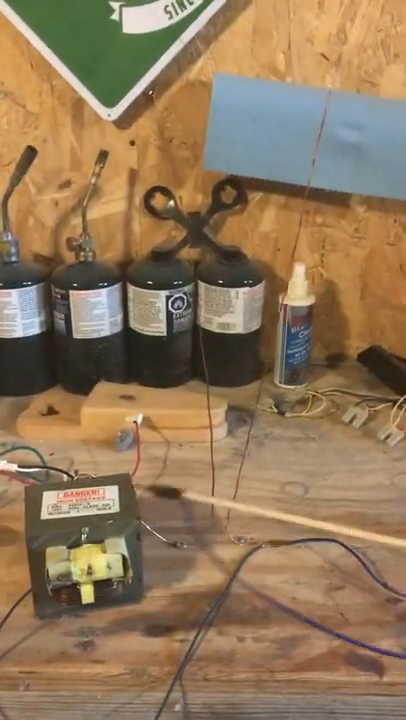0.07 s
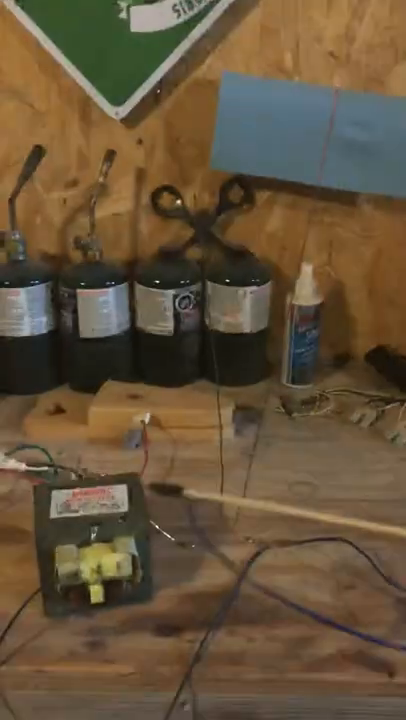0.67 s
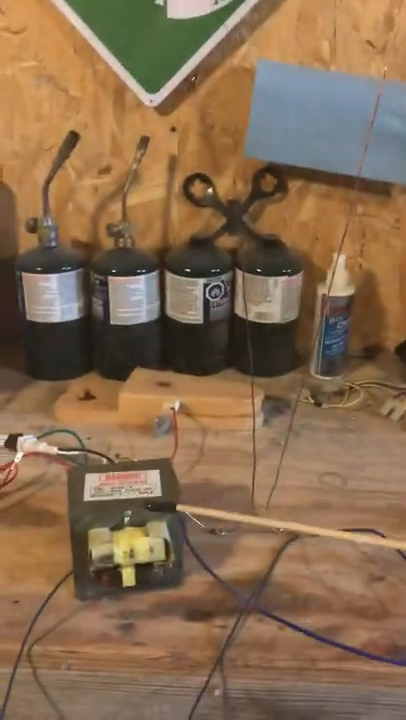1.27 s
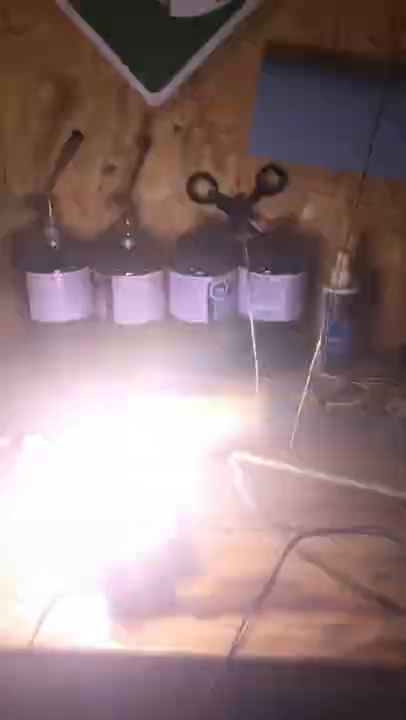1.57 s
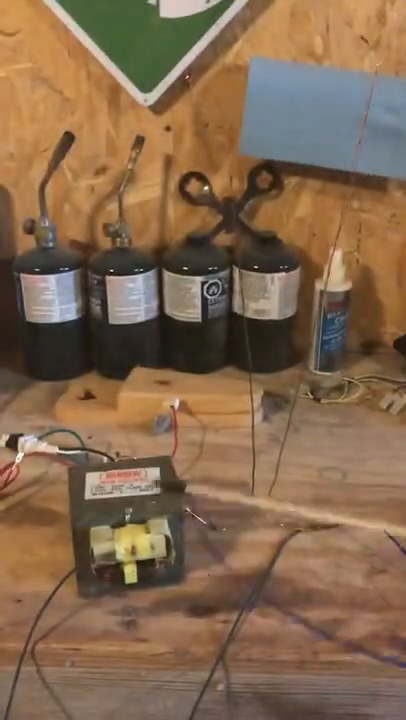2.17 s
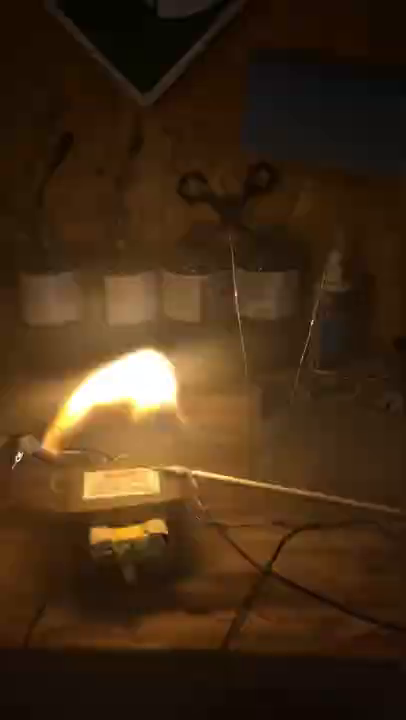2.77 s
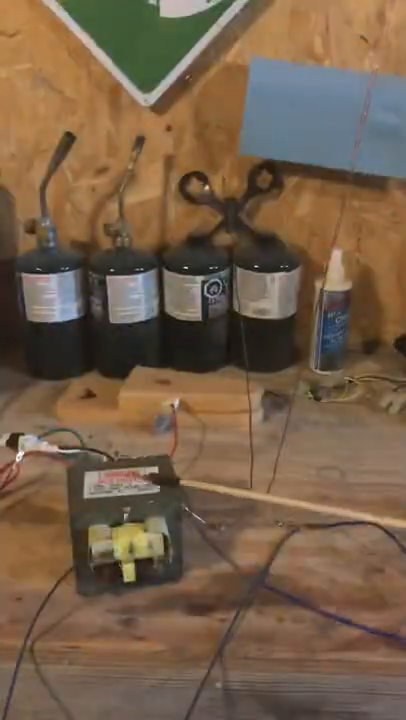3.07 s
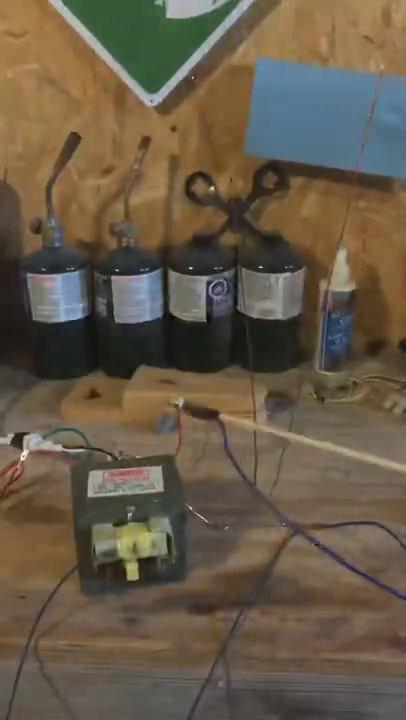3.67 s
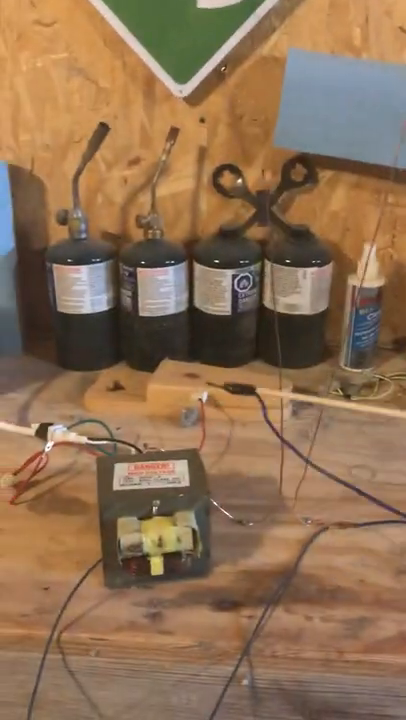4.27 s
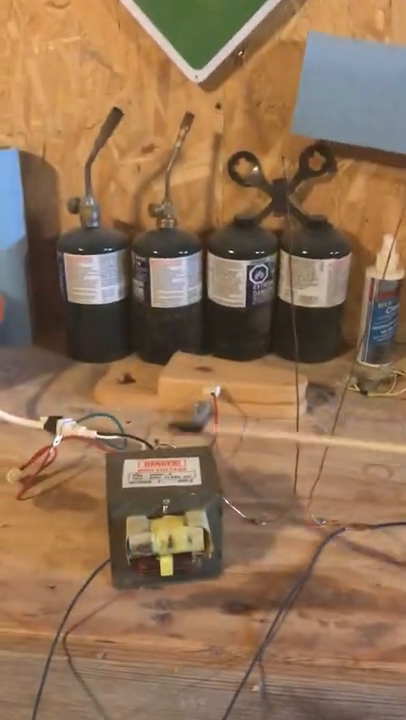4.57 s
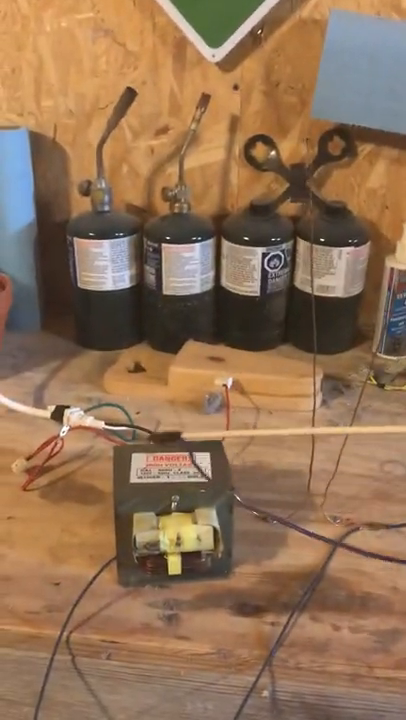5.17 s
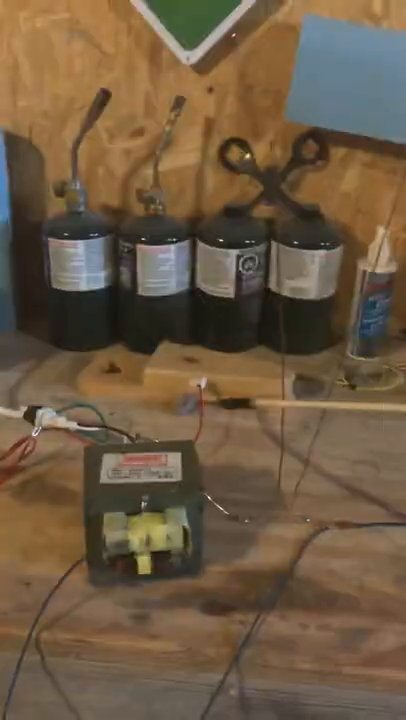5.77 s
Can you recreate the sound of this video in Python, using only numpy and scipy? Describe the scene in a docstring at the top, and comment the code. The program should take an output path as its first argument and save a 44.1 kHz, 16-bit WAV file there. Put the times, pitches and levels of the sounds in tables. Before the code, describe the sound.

Sharp spark crackles lead into five brief, low electrical buzzes, with a quiet hum and rush of air between them.

```python
"""Over a faint hum and rush of air, sparks crack and an electric arc buzzes, five times in all.
A wire on a wooden stick draws the arcs from a mains transformer on a workshop bench.
Each touch spits bursts of sparks. Then a flame of glowing air stands in the gap, hums and pops
in time with the mains, stretches and breaks. The wooden room echoes every crack."""
import sys
import numpy as np
from scipy import signal
from scipy.fft import rfft, irfft, next_fast_len
from scipy.io import wavfile
from scipy.ndimage import map_coordinates

SR = 44100
rng = np.random.default_rng(int(sys.argv[2]) if len(sys.argv) > 2 else 0)


def pcm_store(signal):
    """Save signal as 16-bit PCM."""
    levels = np.round(np.clip(np.atleast_2d(signal), -1, 1) * 32767)
    wavfile.write(sys.argv[1], SR, levels.astype(np.int16).T)


N = 265482
MAINS_HZ = 60


def amp(db):
    """Turn decibels into a number to multiply by."""
    return 10 ** (np.asarray(db) / 20)


def unit(x):
    """Scale a sound to an average strength (rms) of 1."""
    return x / np.sqrt(np.mean(x ** 2) + 1e-20)


def along(points, hz):
    """Read between (frequency, value) points, with octaves evenly spaced."""
    freqs, values = np.transpose(points)
    return np.interp(np.log(hz + 1), np.log(freqs + 1), values)


def clock():
    """The time of every sample, in seconds."""
    return np.arange(N) / SR


def wobble(rate):
    """A smooth random curve through `rate` points a second."""
    return map_coordinates(rng.standard_normal(int(N * rate / SR) + 4), [clock() * rate])


def filtered(x, response):
    """Turn each frequency up or down by response(hz)."""
    size = next_fast_len(N + SR // 2)
    return irfft(rfft(x, size) * response(np.fft.rfftfreq(size, 1 / SR)), size)[:N]


def pulse(spectrum, size=2048):
    """The shortest click with this tone colour, of energy 1."""
    log_gain = np.log(amp(along(spectrum, np.fft.rfftfreq(size, 1 / SR))))
    cepstrum = irfft(log_gain)
    # folding the second half onto the first packs the energy at the start of the click
    cepstrum[1:size // 2] *= 2
    cepstrum[size // 2 + 1:] = 0
    shape = irfft(np.exp(rfft(cepstrum)))
    return shape / np.linalg.norm(shape)


# tone colour of the moving air: (frequency [Hz], relative level [dB])
AIR_SPECTRUM = [(20, -105), (40, -81), (90, -77), (155, -85), (230, -83.5), (390, -81), (500, -87),
                (1000, -89.5), (1300, -90.5), (2200, -95.5), (2700, -99), (4800, -104), (7500, -112),
                (16000, -119.5)]
# narrow bands that ring in the rush: (pitch [Hz], width [Hz], relative level [dB])
AIR_RESONANCES = [(194, 12, -64), (245, 14, -64), (274, 12, -64), (312, 12, -63), (560, 22, -67),
                  (996, 25, -68), (1098, 35, -65), (1165, 30, -70), (1900, 100, -71), (2300, 250, -70),
                  (3650, 600, -71), (6680, 200, -77), (7130, 180, -80), (9300, 900, -82), (11170, 250, -85)]
# idle mains hum and two thin whines: (pitch [Hz], relative level [dB])
IDLE_TONES = [(120, -56.5), (240, -65), (360, -66), (600, -74), (1394, -76), (6638, -84)]


def background():
    """Moving air rushes and drones while the idle mains hums."""
    air = np.sqrt(SR / 2) * filtered(rng.standard_normal(N), lambda hz: amp(along(AIR_SPECTRUM, hz)))
    drone, tones = np.zeros(N), np.zeros(N)
    for centre, width, db in AIR_RESONANCES:
        band = filtered(rng.standard_normal(N), lambda hz: 1 / (1 + (2 * (hz - centre) / width) ** 2))
        drone += amp(db) * unit(band)
    for hz, db in IDLE_TONES:
        strength = np.sqrt(2) * amp(db + 0.89 * wobble(2))
        tones += strength * np.sin(2 * np.pi * hz * clock() + rng.uniform(0, 2 * np.pi))
    return amp(1.33 + .4 * wobble(4.8)) * air + amp(1.66) * drone + amp(1.46) * tones


# bounces off the bench and near walls: (delay [s], level [dB])
NEAR_ECHOES = [(.0016, -17), (.0028, -24.5), (.0045, -14), (.0064, -23.5), (.0078, -16)]


def near_echoes(x):
    """Each nearby surface sends back a quieter copy a moment later."""
    return sum(amp(db) * np.pad(x, (round(delay * SR), 0))[:N] for delay, db in NEAR_ECHOES)


# how long the wooden room rings: (frequency [Hz], time to fade by 60 dB [s])
ROOM_FADE = [(150, 0.12), (600, 0.33), (1500, 0.27), (4000, 0.21), (9000, 0.17), (16000, 0.077)]


def room(x, wet_db, build_s=.0016):
    """Echoes blur into a tail that dies sooner in the treble; the arc moves, so each gets its own."""
    out = np.zeros(N)
    midpoints = [round((arc[1] + following[0]) / 2 * SR) for arc, following in zip(ARCS, ARCS[1:])]
    for start, end in zip([0] + midpoints, midpoints + [N]):
        hz, t, noise = signal.stft(rng.standard_normal(SR // 2), SR, nperseg=256)
        fade = amp(-60 * t / along(ROOM_FADE, hz)[:, None])
        _, tail = signal.istft(noise * fade, SR, nperseg=256)
        tail *= 1 - np.exp(-np.arange(len(tail)) / SR / build_s)
        echo = signal.fftconvolve(x[start:end], tail / np.linalg.norm(tail))[:N - start]
        out[start:start + len(echo)] += echo
    return amp(wet_db) * out


def harmonics(partials, waver_db):
    """Tones at whole multiples of the mains frequency, each wavering in level on its own."""
    phase = 2 * np.pi * MAINS_HZ * clock()
    return sum(amp(db + waver_db * wobble(35)) * np.sin(round(k) * phase) for k, db in partials)


def current(lit, broken, rise_s, fall_s):
    """The current (0 to 1) builds once the arc is lit and dies away when it breaks."""
    t = clock()
    return np.clip((t - lit) / rise_s, 0, 1) * np.exp(-np.maximum(t - broken, 0) / fall_s)


# the five arcs: (lights [s], breaks [s], arc hum [dB], transformer core [dB], time to full current [s],
# flame [dB], flare [dB], growl compared with flutter [dB], fizz [dB])
ARCS = [(0.261, 0.421, -24.5, -36, 0.027, -38.5, 1, -14, -51.5),
        (1.434, 1.583, -27, -33, 0.026, -42, -0.5, -8.5, -54),
        (2.576, 2.749, -25.5, -34, 0.02, -42.5, 2, -8.5, -51),
        (3.313, 3.526, -27.5, -31, 0.028, -42, 6, -11, -54),
        (5.382, 5.602, -31.5, -29.5, .13, -39.5, 14, 2, -50)]
# tones of the arc and of the transformer's core: (multiple of the mains, relative level [dB])
ARC_TONES = [(2, 0), (3, -19.5), (4, -7.5), (5, -13.5)]
CORE_TONES = [(6, 7.5), (8, -14), (10, -13), (16, -12)]


def hum(core_change_db=-5.5, stretch_db=2.5):
    """The arc's hum swells as it is drawn longer; the loaded core buzzes along and eases off."""
    arc, core = harmonics(ARC_TONES, waver_db=2.06), harmonics(CORE_TONES, waver_db=2.5)
    out = np.zeros(N)
    for lit, broken, hum_db, core_db, build_s, *_ in ARCS:
        stretch = np.clip((clock() - lit) / (broken - lit), 0, 1)
        arc_gain = amp(hum_db + stretch_db * (stretch - 1))
        core_gain = amp(core_db + core_change_db * stretch)
        out += current(lit, broken, rise_s=.018, fall_s=.0064) * arc_gain * arc
        out += current(lit, broken, rise_s=build_s, fall_s=.0074) ** 2 * core_gain * core
    return out


def relights(spectrum, rate, lag_s, roughness, puff_s, scatter_db):
    """The arc relights `rate` times a second, each time with a pop and a fading puff of noise."""
    times = np.arange(lag_s, (N - 1) / SR, 1 / rate)
    sizes = amp(scatter_db * rng.standard_normal(len(times)))
    pops = np.bincount((times * SR).astype(int), sizes, N)
    fades = signal.lfilter([1], [1, -np.exp(-1 / (puff_s * SR))], pops)
    puffs = fades * rng.standard_normal(N)
    train = roughness * unit(puffs) - unit(pops)
    return unit(signal.fftconvolve(train, pulse(spectrum))[:N])


def unrest(lit, broken, flare_db, ignition_db=10, settle_s=.045, flare_lead_s=.06, flare_width_s=.052):
    """Extra level in dB: a fresh flame is restless, settles, then can flare just before it breaks."""
    t = clock()
    settling = np.exp(-np.maximum(t - lit, 0) / settle_s)
    flaring = np.exp(-((t - broken + flare_lead_s) / flare_width_s) ** 2)
    return ignition_db * settling + flare_db * flaring


# tone colours of the flame's three voices: (frequency [Hz], relative level [dB])
FLUTTER_SPECTRUM = [(40, -30), (130, 4.5), (250, 5), (350, 3), (500, -10), (610, 0), (760, -5.5),
                    (1000, -9.5), (1500, -12.5), (2200, -17.5), (3500, -25.5), (6000, -35), (16000, -45)]
GROWL_SPECTRUM = [(40, -13.5), (110, 0), (190, -3.5), (260, 0.5), (370, 4), (520, -11), (650, -8.5),
                  (800, -13.5), (1020, -4), (1200, -9.5), (1450, -10.5), (2100, -27.5), (4000, -32.5),
                  (12000, -52.5)]
FIZZ_SPECTRUM = [(1500, -22), (3500, 8), (7000, 2.5), (10000, -1.5), (13000, -0.5), (15500, -3),
                 (17500, -28)]


def flame():
    """The arc flutters and fizzes twice a mains cycle; a harder pop in one direction makes it growl."""
    flutter = relights(FLUTTER_SPECTRUM, 2 * MAINS_HZ, .0058, roughness=1.8, puff_s=.0035, scatter_db=2)
    growl = relights(GROWL_SPECTRUM, MAINS_HZ, .0141, roughness=.32, puff_s=.001, scatter_db=4)
    fizz = relights(FIZZ_SPECTRUM, 2 * MAINS_HZ, .0058, roughness=9, puff_s=.0078, scatter_db=5)
    out = np.zeros(N)
    for lit, broken, *_, flame_db, flare_db, growl_db, fizz_db in ARCS:
        strength = amp(flame_db + unrest(lit, broken, flare_db))
        # the more lopsided the arc, the bigger the growl's share
        roar = (flutter + amp(growl_db) * growl) / np.hypot(1, amp(growl_db))
        out += current(lit, broken, rise_s=.017, fall_s=.0023) * (strength * roar + amp(fizz_db) * fizz)
    return out


def spark_burst(length_s, spacing_s=.0006, scatter_db=2, sizzle=.33, sizzle_s=.002, size=1024):
    """Tiny sparks jump in quick, uneven succession over a short sizzle."""
    t = np.arange(size) / SR
    count = 1 + round(length_s / spacing_s)
    jitter = rng.uniform(-.5, .5, 20)[:count]
    sizes = amp(scatter_db * rng.standard_normal(20)[:count])
    times = np.abs(np.linspace(0, length_s, count) + (count > 1) * spacing_s * jitter)
    snaps = np.bincount((times * SR).astype(int), sizes, size)[:size]
    # the sizzle builds while the sparks last, then dies away
    glow = np.minimum(t / (length_s + 1 / SR), 1) * np.exp(-np.maximum(t - length_s, 0) / sizzle_s)
    return unit(snaps) + sizzle * unit(glow * rng.standard_normal(size))


def sputter(start_s=1.349, first_db=-29.5, fade_db=1, length_s=.0025, count=4):
    """A grazing touch adds one burst each mains cycle, a little weaker every time."""
    return [(start_s + k / MAINS_HZ, first_db - k * fade_db, length_s) for k in range(count)]


# each touch of the wire has its own spark colour: (edge [dB], crack [dB], thump [dB])
TOUCH_COLOURS = [(0.5, -1, 0.5), (-1, .5, -1), (1.5, 0, -1.5), (-1, 2.4, 0.5), (1.4, -0.2, 5)]


def gap_state(time_s, heat_s=.012):
    """How hot the gap is (0 to 1, rising as the nearest arc lights) and the colour of that touch."""
    lit_times = np.array([arc[0] for arc in ARCS])
    nearest = np.argmin(np.abs(lit_times - time_s))
    heat = (1 + np.tanh((time_s - lit_times[nearest]) / heat_s)) / 2
    return heat, TOUCH_COLOURS[nearest]


# a spark's bright edge, sharp crack and low thump: (frequency [Hz], relative level [dB])
EDGE_SPECTRUM = [(1500, -37.5), (3500, -16), (4900, -9), (6300, 2.5), (7300, -5), (8300, 1), (9300, 1.5),
                 (10500, -6.5), (12000, 3), (15500, -8.5), (17500, -35)]
CRACK_SPECTRUM = [(300, -35.5), (1200, -10), (1900, -6), (2450, 1), (3000, -3), (3800, 2.5), (4800, -6.5),
                  (7000, -15), (16000, -42.5)]
THUMP_SPECTRUM = [(40, -23.5), (120, -6.5), (250, -4), (360, 9), (520, -8.5), (750, -3.5), (950, 6),
                  (1250, -1.5), (1900, -7.5), (3500, -23), (9000, -56.5)]
# one row each for edge, crack and thump, in a burst of typical level:
# (cold gap [dB], hot gap [dB], change for a thin snap [dB], growth with burst level [dB per dB])
SPARK_MIX = [(-2, -8.5, 0.5, 1), (-3.5, -1, -5, 1), (-13.5, -4, -11.5, 0.88)]
# bursts of sparks, length 0 being a single snap: (time [s], level before the mix [dB], length [s])
SPARK_BURSTS = [(0.1937, -42.5, 0), (0.2407, -14.5, .0016), (0.259, -15.5, 0.00058), (.267, -17.5, 0.0002),
                (0.2763, -15, 0.0012), (0.2934, -42, 0.0019), (0.3092, -25, 0), (0.354, -39, .002),
                (1.4158, -16.5, 0.0018), (1.423, -14, 0.0024), (1.4316, -10.5, 0.0051),
                (1.4485, -16.5, 0.0054), (1.4672, -21, 0), (1.5007, -31.5, 0.0018), (1.5177, -26, 0),
                (2.5481, -14.5, 0.0032), (2.573, -17.5, 0.002), (2.582, -15, 0.0026), (2.589, -16.5, 0.004),
                (2.5993, -16, 0.00059), (3.2176, -35, 0.00028), (3.223, -12.5, 0.0036), (3.2487, -20.5, 0),
                (3.264, -14, 0.005), (3.2923, -14.5, 0.000059), (3.2983, -15, 0.0044),
                (3.3068, -13.5, 0.000022), (3.3164, -16, .0025), (3.322, -24, 0.0027),
                (3.3318, -30, 0.0015), (3.378, -36.5, .001), (3.4335, -43, 0.0025), (5.262, -36, 0),
                (5.2732, -29.5, 0.0043), (5.2816, -15, 0.0028), (5.315, -18.5, 0.0058),
                (5.3397, -21, 0.0012), (5.3524, -26.5, 0.0024), (5.3565, -28, 0.007),
                (5.3848, -21.5, 0.0017), (5.399, -24.5, 0.0036), (5.417, -20.5, 0.00028),
                (5.4681, -26, 0.0017), (5.4986, -21.5, 0.00093)]


def sparks(typical_db=-20.5, thin_s=.0005):
    """A first touch is thin and bright; the hotter the gap, the more the air cracks and thumps."""
    out = np.zeros(N)
    clicks = [pulse(EDGE_SPECTRUM), -pulse(CRACK_SPECTRUM), pulse(THUMP_SPECTRUM)]
    span = .005 * SR  # a level is the snap's strength as if spread over 5 ms
    for time_s, db, length_s in SPARK_BURSTS + sputter():
        burst, start = spark_burst(length_s), round(time_s * SR)
        heat, touch = gap_state(time_s)
        thin = (1 - heat) * np.exp(-length_s / thin_s)  # very short bursts stay thin in a cold gap
        for click, touch_db, (cold_db, hot_db, thin_db, growth) in zip(clicks, touch, SPARK_MIX):
            level_db = typical_db + growth * (db - typical_db)
            mix_db = touch_db + (1 - heat) * cold_db + heat * hot_db + thin * thin_db
            snap = signal.fftconvolve(burst, click)
            snap *= np.sqrt(span) / np.linalg.norm(snap)
            out[start:start + len(snap)] += amp(level_db + mix_db) * snap
    return out


def scene():
    """Sparks, flame and hum sound in the wooden workshop, over its quiet background."""
    crackle, buzz = sparks() + flame(), hum()
    crackle_in_room = crackle + near_echoes(crackle) + room(crackle, wet_db=-8.5)
    buzz_in_room = buzz + room(buzz, wet_db=-21)
    return (crackle_in_room + buzz_in_room + background())[None]


def record(dry):
    """The loudest cracks overload the microphone, and the very highest treble is cut off."""
    ceiling, top_hz = .92, 16200
    rounded = dry[0] / (1 + (dry[0] / ceiling) ** 4) ** (1 / 4)
    return filtered(rounded, lambda hz: 1 / np.sqrt(1 + (hz / top_hz) ** 160))[None]


dry = scene()
out = record(dry)
pcm_store(out)
```